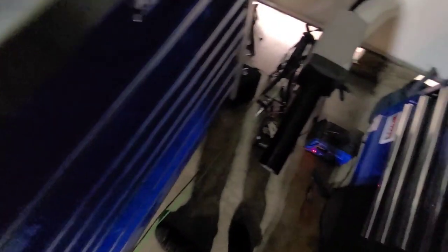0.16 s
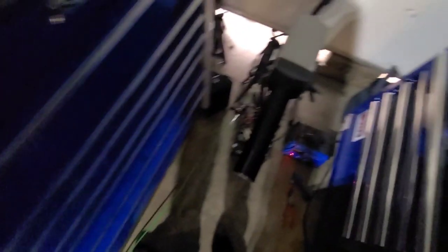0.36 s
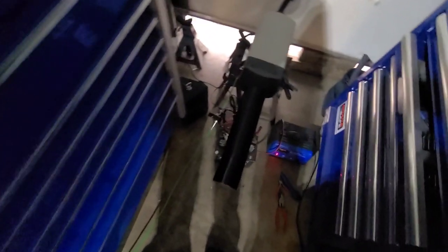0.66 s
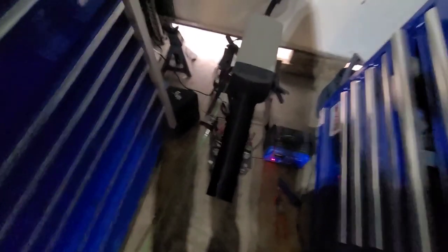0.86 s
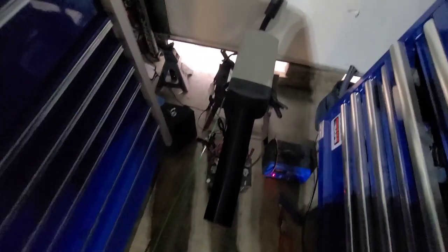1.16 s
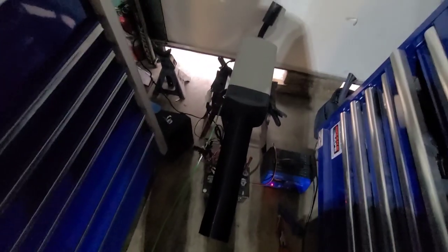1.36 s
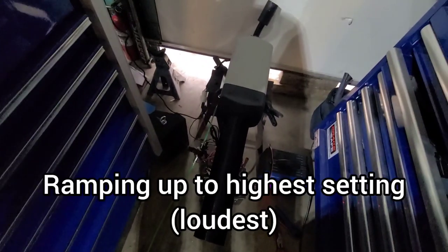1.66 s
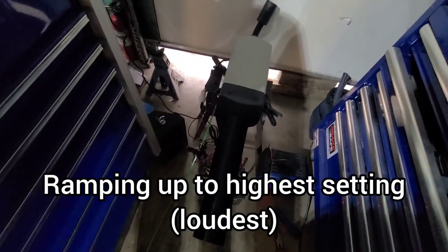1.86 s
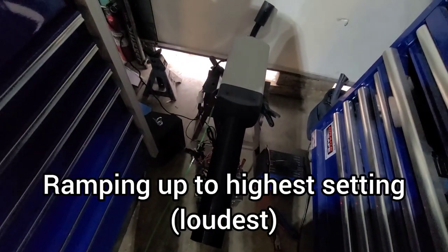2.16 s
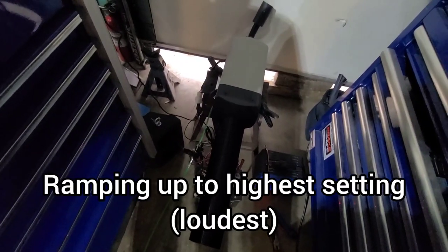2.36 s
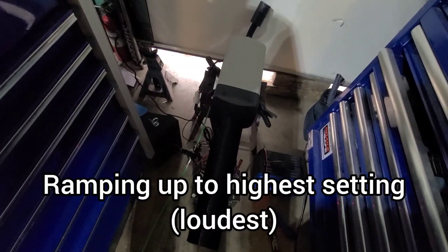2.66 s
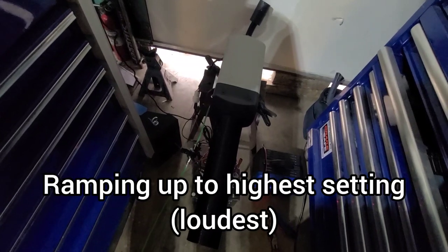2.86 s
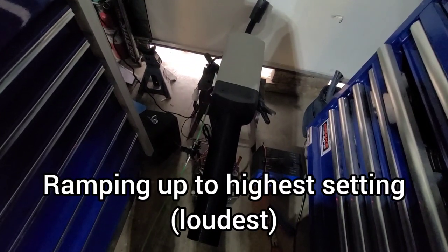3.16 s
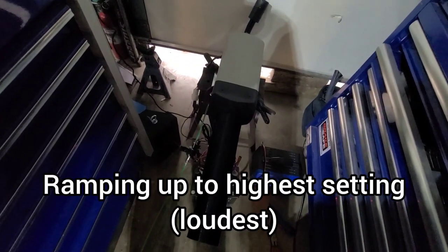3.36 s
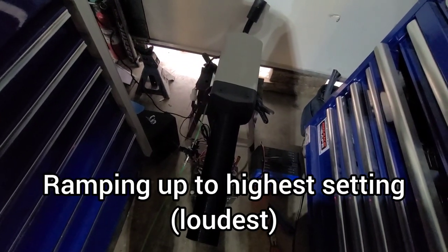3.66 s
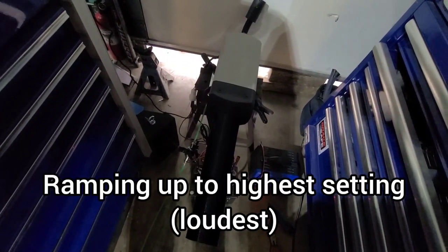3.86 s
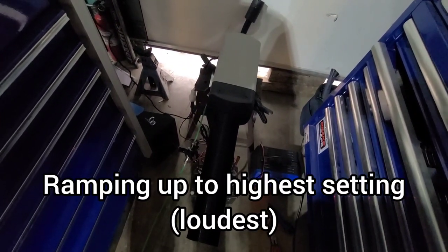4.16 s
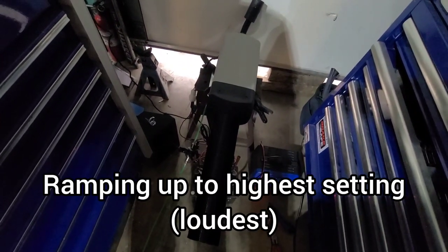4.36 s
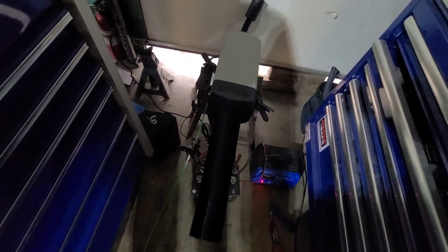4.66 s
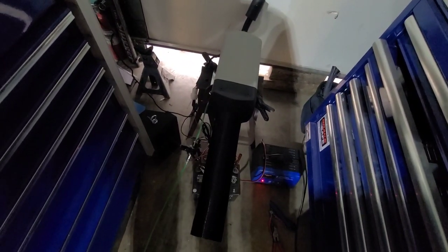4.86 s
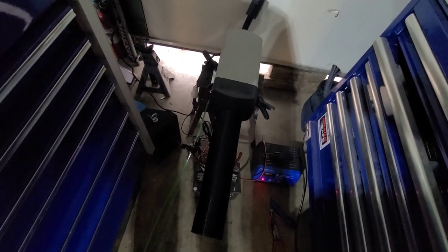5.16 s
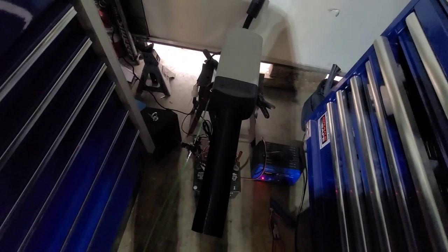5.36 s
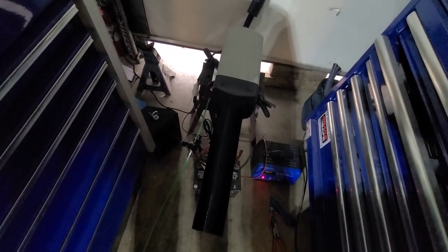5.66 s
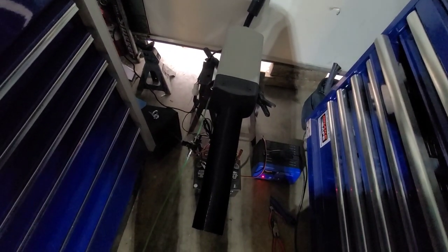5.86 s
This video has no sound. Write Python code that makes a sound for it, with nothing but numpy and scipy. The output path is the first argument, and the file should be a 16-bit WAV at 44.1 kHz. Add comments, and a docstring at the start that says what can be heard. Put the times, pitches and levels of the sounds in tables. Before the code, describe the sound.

Close stereo pickup of a running heater: sharp handling clicks at the very start, mostly to the left, with weaker ones and a soft rustle half a second in. Then steady low blower roar with uneven rumbling surges, a gradually rising hum-like whine, a faint fluttering higher whistle that builds, and regular light double ticks from the fuel pump with a short garage tail.

```python
"""A garage in which a diesel air heater ramps up, heard by a pair of microphones.
The flame and blower roar as turbulent noise, duct resonances and surging low rumble; the fan is a climbing tone
and the air jet a fluttering narrow band. The fuel pump ticks in pairs of noise bursts that ring its body.
Sharp clicks sound close to the microphones at the start: pushes that ring and thump.
Brief rustles and thin hiss are filtered noise."""
import sys
import numpy as np
from scipy import signal
from scipy.fft import rfft, irfft
from scipy.io import wavfile
from scipy.ndimage import uniform_filter1d

SR = 44100
rng = np.random.default_rng(int(sys.argv[2]) if len(sys.argv) > 2 else 0)


def convert_level_to_amplitude(level_db):
    """Map a level in decibels to its linear amplitude factor."""
    exponent = np.asarray(level_db, float) / 20
    return 10 ** exponent


def store_wav(level_fs):
    """Save 16-bit WAV to argv[1]."""
    pcm = np.round(np.clip(np.atleast_2d(level_fs), -1, 1) * 32767)
    wavfile.write(sys.argv[1], SR, pcm.T.astype(np.int16))


N = 264600  # samples
SIZE, HOP = 2048, 512  # short-time spectrum length and step, samples


def evened(x):
    """Normalisation by mean power: scales to rms 1."""
    return x / np.sqrt(np.mean(np.abs(x) ** 2) + 1e-20)


def curve(rows, x):
    """Linear interpolation: reads every column of a table against its first column at x."""
    first, *columns = np.transpose(rows)
    return [np.interp(x, first, column) for column in columns]


def sides(pan_db):
    """Interaural level difference: left and right gains, each taking half of left minus right."""
    return convert_level_to_amplitude(np.array([pan_db / 2, -pan_db / 2]))


def pair(z, pan_db, lead):
    """Interaural phase: one complex signal at both microphones, the left one ahead by lead radians."""
    return sides(pan_db).reshape(2, -1) * np.real([z * np.exp(1j * lead), z])


def add(mix, s, sound):
    """Superposition: mixes a sound in from s seconds on."""
    part = mix[:, round(s * SR):][:, :sound.shape[1]]
    part += sound[:, :part.shape[1]]


def resonate(x, hz, width):
    """Damped oscillator as one complex pole; for a real input its real part has gain 1 at resonance."""
    r = np.exp(-np.pi * width / SR)
    return 2 * signal.lfilter([1 - r], [1, -r * np.exp(2j * np.pi * hz / SR)], x)


def steadied(hz, width, share):
    """Narrow-band noise whose random envelope is partly flattened, by a share from 0 to 1."""
    ring = resonate(resonate(rng.standard_normal(N), hz, width), hz, 3 * width)
    return np.sqrt(2) * evened(ring / np.abs(ring) ** np.clip(share, 0, 1))


def sway(seconds, channels=1):
    """Low-passed noise: a slow random wobble of rms 1."""
    size = max(round(seconds * SR), 1)
    noise = rng.standard_normal((channels, N))
    return evened(uniform_filter1d(uniform_filter1d(noise, size), size))


def airflow():
    """Turbulence: random short-time spectra with drifting patches, partly coherent at both microphones."""
    # Airflow between the duct resonances. Each row: frequency in Hz, spectral density in relative dB per Hz.
    air = [(30, -43), (75, -2.5), (138, -15.5), (227, -4), (345, -12.5), (449, -7), (505, -14), (616, -20),
           (1250, -20), (1590, -29), (2230, -26), (2830, -34), (5000, -47.5), (7500, -51.5), (9000, -62),
           (16000, -69)]
    # Coherence of the microphone pair. Each row: frequency in Hz, left-right likeness from 0 to 1,
    # phase by which left leads in radians, left minus right in dB.
    likeness = [(60, .975, 0, -.6), (356, .99, .2, -.4), (850, 0.88, 0.81, 0.5), (1060, 0.77, 1.38, 1),
                (1730, 0.13, 0.5, -1), (2600, 0.42, 2, 1), (4070, 0.75, 1, 5.5), (5500, .3, 1.5, 2),
                (9000, 0.09, 24, 3.5), (15000, .2, 11.5, 3)]
    level_db, patch_db = -40.5, 1.22  # rms of the airflow before burner power; depth of the patches
    hz = np.fft.rfftfreq(SIZE, 1 / SR)

    def on_log(rows):
        """Interpolation over logarithmic frequency."""
        return curve([(np.log(f), *values) for f, *values in rows], np.log(hz + 1))

    a, b, c, d, patches = rng.standard_normal((N // HOP + 5, len(hz), 5)).T
    patches = evened(uniform_filter1d(uniform_filter1d(patches, 20, 0), 6, 1))
    same, lead, pan_db = on_log(likeness)
    same = np.clip(same, 0, 1)[:, None]
    right = a + 1j * b
    left = same * np.exp(1j * lead)[:, None] * right + np.sqrt(1 - same ** 2) * (c + 1j * d)
    colour = convert_level_to_amplitude(on_log(air)[0][:, None] + patch_db * patches)
    spectra = np.array([left, right]) * sides(pan_db)[:, :, None] * colour
    flow = signal.istft(spectra, nperseg=SIZE, noverlap=SIZE - HOP)[1][:, :N]
    return convert_level_to_amplitude(level_db) * evened(flow)


def ducts(power_db):
    """Resonance: flame noise rings in each duct mode; the lowest modes swell most with burner power."""
    # Duct and housing modes. Each row: frequency in Hz, width in Hz, rms level in dB before burner power
    # (mean of the sides), left minus right in dB, phase by which left leads in radians.
    modes = [(165, 50, -57.5, 0, .1), (238.7, 52, -47.5, -0.3, .15), (295.7, 17, -55.5, .5, .4),
             (392, 30, -57, 1, .25), (440, 50, -51, 1, 0.27), (480, 22, -57, 0, .3),
             (547, 30, -63.5, -7, 0.03), (759.7, 23, -64, -1, 0.07), (1210, 55, -59, -8.5, .5),
             (1274.8, 28, -54, 0.5, 1.5), (1900, 110, -61, -5.5, 4), (2466, 120, -68.5, -6, 2),
             (6420, 1300, -70, 0.5, 1.5)]
    out = np.zeros((2, N))
    for hz, width, db, pan_db, lead in modes:
        flame = rng.standard_normal(N)
        ring = np.sqrt(2) * evened(resonate(resonate(flame, hz, width), hz, width))
        out += convert_level_to_amplitude(db + power_db / (1 + hz / 400)) * pair(ring, pan_db, lead)
    return out


def rumble(t):
    """Driven resonance: the flame pulses near the lowest exhaust mode, which smooths each surge."""
    # Strongest surges of the flame. Each row: centre in seconds, rise above the steady level in dB.
    surges = [(0, 12), (.41, 9.5), (.63, 3), (.8, 8), (.93, 4), (1.2, 6), (1.46, 5), (1.79, 3.5), (2.09, 9),
              (3.13, 5), (3.3, 6), (3.7, 8.5), (3.79, 4.5), (3.96, 3), (4.09, 5), (4.3, 8.5), (4.7, 6),
              (4.81, 7), (5.01, 4.5), (5.3, 10), (5.68, 8), (5.86, 7)]
    steady_db, hz, width = -41.5, 74.5, 15.4  # level before smoothing in dB rms, Hz, Hz
    surge_s, throb_db, throb_s = .036, 2.2, .04  # half length of a surge; depth and smoothing of random throb
    surge_db = sum(db * np.exp(-((t - s) / surge_s) ** 2) for s, db in surges)
    level = convert_level_to_amplitude(steady_db + surge_db + throb_db * sway(throb_s)[0])
    flame = level * steadied(hz, width, .55)
    smooth = resonate(flame, hz, 130) / 2  # halved because the flame signal is complex
    return pair(smooth, -0.78, -0.21)


def whine(t):
    """Blade-passing tone: a climbing sine that the garage favours now at one side, now the other."""
    # Blade tone as the listener turns and settles. Each row: time in seconds, right level in dB rms.
    tone_level = [(0, -59), (.27, -63), (.38, -57), (.8, -53.5), (1.1, -50.5), (1.6, -54.5), (2.5, -51.5),
                  (3.6, -52), (4.2, -52.5), (4.5, -48.5), (5.5, -48), (6, -51)]
    # Balance of the tone. Each row: time in seconds, left minus right in dB.
    balance = [(0, 2.5), (1, -1), (2, -7.5), (3, -9), (4.2, -6), (6, -13.5)]
    start_hz, climb_hz_per_s, waver_hz = 890.6, 9.05, 1.09  # waver: rms of the random pitch drift
    lead, sway_db = -.2, 1.3  # radians by which left leads; random level sway of each side
    right_db, pan_db = curve(tone_level, t)[0], curve(balance, t)[0]
    waver = waver_hz * evened(uniform_filter1d(rng.standard_normal(N), 3000))
    phase = 2 * np.pi * np.cumsum(start_hz + climb_hz_per_s * t + waver) / SR
    level = convert_level_to_amplitude(np.array([right_db + pan_db, right_db]) + sway_db * sway(0.21, channels=2))
    return np.sqrt(2) * level * np.sin([phase + lead, phase])


def whistle(t):
    """Jet whistle: a narrow noise band that strengthens as the flow builds and drops out briefly."""
    # Fuzzy whistle of the air jet. Each row: time in seconds, level between drop-outs in dB rms.
    jet_level = [(0, -63), (.88, -67), (1.02, -61), (1.5, -56.5), (3, -56), (4.5, -56.5), (5.2, -60.5),
                 (6, -54)]
    flutter_db, flutter_s = 3.5, .025  # depth and smoothing of the drop-outs
    flutter = np.minimum(sway(flutter_s), 0)  # only the downward half of the wobble
    level = convert_level_to_amplitude(curve(jet_level, t)[0] + flutter_db * flutter)
    return level * pair(steadied(2226, 27, 0.1), -6, 1.35)


def struck(body, noise):
    """Impact excitation: the chatter of a blow, its bounce and the garage tail in broad resonances."""
    bounce_s, bounce_db = 0.014, -27  # the piston bounces once
    echo_db, echo_t60 = -17, 0.32  # the garage draws each tick out: dB, s
    t = np.arange(noise.shape[-1]) / SR
    sound = 0
    for k, (hz, width, db, t60) in enumerate(body):
        def blow(u):
            """Exponential decay after a 2.5 ms rise."""
            return np.clip(u / 0.0025, 0, 1) * convert_level_to_amplitude(-60 * u / t60)

        shape = blow(t) + convert_level_to_amplitude(bounce_db) * blow(t - bounce_s)
        shape += np.minimum(t / 0.0034, 1) * convert_level_to_amplitude(echo_db - 60 * t / echo_t60)
        own = np.roll(noise, k * HOP, axis=1)  # each part chatters in its own way
        ring = resonate(resonate(own, hz, width), hz, width).real
        sound = sound + convert_level_to_amplitude(db) * shape * evened(ring)
    return sound


def pump():
    """Modal excitation: each stroke, a blow and a softer return, rings body, mount and snap."""
    # Fuel pump strokes, a little quicker from the sixth on. Each row: blow time in seconds, blow level in dB,
    # return level in dB, mount level relative to the blow in dB, strongest ring of the blow in Hz.
    strokes = [(.1443, -44.5, -52, 0, 6060), (0.5008, -46.5, -52.5, -3, 6740), (0.857, -46, -50, 0, 5970),
               (1.214, -44.5, -55.5, -6.5, 6380), (1.569, -46, -56.5, -2, 6550),
               (1.9255, -45, -52.5, -4, 6760), (2.2692, -45, -52, 0, 6030), (2.611, -46.5, -54.5, -7, 5630),
               (2.9555, -46, -54, 5.5, 6900), (3.299, -46, -52.5, 0, 7040), (3.641, -44, -54.5, -9, 7080),
               (3.9846, -44, -56, -3.5, 6720), (4.3276, -45.5, -51, -1, 6830),
               (4.6713, -45, -55, -11, 7100), (5.015, -46.5, -50, -.6, 6100),
               (5.357, -47.5, -56, 1.5, 7460), (5.701, -47.5, -58, 5.5, 6100)]
    # Pump body. Each row: frequency in Hz, width in Hz, relative level in dB, 60 dB decay time in seconds.
    body = [(5695, 480, -2, 0.037), (6250, 350, 0.5, 0.03), (6900, 1140, 3.5, 0.027),
            (4970, 1000, -5.5, 0.022), (8000, 390, -13.5, 0.0082)]
    # Pump mount. Each row: frequency in Hz, width in Hz, relative level in dB, 60 dB decay time in seconds.
    mount = [(3290, 510, -1, 0.028)]
    # Bright snap. Each row: frequency in Hz, width in Hz, relative level in dB, 60 dB decay time in seconds.
    bright = [(4000, 9300, 14, 0.022), (9700, 3700, 3.1, 0.033), (12500, 8000, 2.5, 0.025),
              (15300, 2300, 1, 0.03)]
    return_s, return_mount_db = .0535, -13  # the piston springs back this much later; its relative mount level
    blow_pan_db, return_pan_db, pan_spread_db = 3, 1.5, -1.5  # left minus right, and its random spread
    return_hz, return_spread_hz = 6100, 260  # the ring that a return favours
    snap_rel_db, snap_share = -11.5, 0.59  # relative to a -51.5 dB hit; share by which it follows strength
    out = np.zeros((2, N))
    chances = rng.uniform(-1.2, 1, (len(strokes), 3))
    noises = rng.standard_normal((len(strokes), 2, 2, SR // 5))
    for stroke, (u, v, w), both in zip(strokes, chances, noises):
        s, blow_db, back_db, mount_db, ring_hz = stroke
        blow_pan = blow_pan_db + pan_spread_db * u
        back_pan = return_pan_db + pan_spread_db * v
        back_hz = return_hz + return_spread_hz * w
        hits = ((s, blow_db, mount_db, blow_pan, ring_hz),
                (s + return_s, back_db, return_mount_db, back_pan, back_hz))
        for (at, db, knock_db, pan_db, core_hz), noise in zip(hits, both):
            tick = struck(body + [(core_hz, 300, 0, .05)], noise)
            tick += convert_level_to_amplitude(knock_db) * struck(mount, noise)
            snap_db = snap_rel_db + (snap_share - 1) * (db + 51.5)
            tick += convert_level_to_amplitude(snap_db) * struck(bright, noise)
            add(out, at - .001, convert_level_to_amplitude(db) * sides(pan_db)[:, None] * tick)
    return out


def clicks():
    """Impulse response: a sharp push in faint crackle, band-limited, with a short ring and a thump."""
    # Sharp clicks. Each row: start in seconds, peak level in dB (mean of the sides), left minus right in dB,
    # top edge of the band in Hz, ring in Hz.
    events = [(0.0354, -32, -14, 6600, 2440), (0.0393, -32, -15, 6840, 2700), (0.0443, -28, -8, 7000, 6000),
              (0.0485, -8, -14, 7150, 4840), (0.0524, -21, 5, 8000, 6200), (0.06, -15, -12, 6640, 2690),
              (0.0624, -13.5, 18, 8000, 6900), (.0626, -21, -1.5, 4000, 2500),
              (0.0634, -19, -7, 2240, 1030), (.213, -39, 1, 5000, 2500), (.249, -44, -14, 7000, 4500),
              (.432, -28, -4.5, 6600, 2480), (.4905, -37, 8, 7000, 6000), (0.4933, -28, -1.5, 1200, 700),
              (.517, -46, -2, 5000, 3500), (0.5259, -22, -9, 6800, 1960)]
    crackle_t60 = 0.0045  # s
    ring_gain, ring_width = 1.6, 800  # gain, Hz
    shell_hz, shell_width, shell_db = 1070, 830, 4  # the shell that every click thumps
    far_side_s, far_side_db = .0004, 10  # greatest delay of the quieter side, at this level difference or more
    out, t = np.zeros((2, N)), np.arange(600) / SR
    low_cut = signal.butter(4, 520, "highpass", fs=SR, output="sos")
    noises = rng.standard_normal((len(events), 2, len(t)))
    for (s, db, pan_db, edge_hz, ring_hz), noise in zip(events, noises):
        crackle = noise * np.minimum(t / 0.0001, 1) * convert_level_to_amplitude(-60 * t / crackle_t60)
        push = .3 * crackle - signal.unit_impulse(len(t), idx=14)
        ring = ring_gain * resonate(push, ring_hz, ring_width).real
        thump = convert_level_to_amplitude(shell_db) * resonate(push, shell_hz, shell_width).real
        crack = push + ring + thump
        dull = signal.sosfilt(signal.butter(4, edge_hz, fs=SR, output="sos"), crack)
        leak = convert_level_to_amplitude(-16.5) * (edge_hz / 7000) ** 2 * crack  # a little passes the edge
        crack = signal.sosfilt(low_cut, dull + leak)
        crack = crack / np.abs(crack).max(axis=1, keepdims=True)
        crack = convert_level_to_amplitude(db) * sides(pan_db)[:, None] * crack
        right_late_s = far_side_s * np.clip(pan_db / far_side_db, -1, 1)
        add(out[:1], s + max(-right_late_s, 0), crack[:1])
        add(out[1:], s + max(right_late_s, 0), crack[1:])
    return out


def rustles(t):
    """Friction noise: brief scrapes, each a swell of rough, grainy band noise."""
    # Soft rustles. Each row: centre in seconds, length in seconds, level at the centre in dB rms,
    # low band edge in Hz, high band edge in Hz.
    scrapes = [(0.511, 0.039, -50, 1500, 5500), (1.79, .03, -66, 4000, 15000),
               (1.837, 0.048, -61, 4000, 15000), (2.436, 0.11, -63.5, 4830, 8700)]
    out = np.zeros((2, N))
    grain_db = 3.2 * evened(uniform_filter1d(rng.standard_normal(N), 60))
    grain = rng.standard_normal((2, N)) * convert_level_to_amplitude(grain_db)
    for s, length, db, low_hz, high_hz in scrapes:
        band = signal.butter(2, [low_hz, high_hz], "bandpass", fs=SR, output="sos")
        swell = np.exp(-((t - s) / length * 2) ** 2)
        out += convert_level_to_amplitude(db) * swell * evened(signal.sosfilt(band, grain))
    return out


def hiss(t):
    """Incoherent noise: thin high hiss, unrelated at the two microphones, and a drifting top band."""
    # Colour of the wide hiss. Each row: frequency in Hz, spectral density in relative dB per Hz.
    colour = [(6000, -16), (7800, 4), (9000, -5), (10000, 0), (11300, -2), (12500, 4), (14500, 4.5),
              (16000, 2)]
    wide_db, fade_db_per_s = -70.5, -0.5  # rms at the start (mean of the sides), thinning slowly
    top_db, top_sway_db = -77.5, 0.5  # rms of the top band and of its level drift
    noise = rng.standard_normal((2, N))
    hz = np.fft.rfftfreq(N, 1 / SR)
    wide = irfft(rfft(noise) * convert_level_to_amplitude(curve(colour, hz)[0]) * (hz > colour[0][0]), N)
    wide = convert_level_to_amplitude(wide_db + fade_db_per_s * t) * evened(wide)
    top = resonate(resonate(noise[:, ::-1], 15600, 250), 15600, 250).real  # reversed: unlike the wide hiss
    top = convert_level_to_amplitude(top_db + top_sway_db * sway(.3)) * evened(top)
    return sides(3.9)[:, None] * (wide + top)


def scene():
    """Superposition of all sources at the microphones; burner power drives the ducts and the airflow."""
    # Burner power. Each row: time in seconds, level in dB; a quarter of the dB reaches the airflow.
    burner = [(0, 1.5), (1, -1), (2, 1), (3, 0.5), (4, 2.5), (5, 1.5), (6, 4.5)]
    t = np.arange(N) / SR
    power_db = curve(burner, t)[0]
    roar = convert_level_to_amplitude(0.25 * power_db) * airflow() + ducts(power_db) + rumble(t)
    steady = roar + whine(t) + whistle(t) + hiss(t)
    return steady + pump() + clicks() + rustles(t)


def top_cut(x):
    """Nothing passes above the cut-off."""
    return signal.sosfilt(signal.butter(12, 16760, fs=SR, output="sos"), x)


def record(dry):
    """Band limitation: high-pass and low-pass filters set the microphone band."""
    # Microphone band: low edge in Hz, high edge in Hz.
    band_edges = [40, 15800]
    low_cut = signal.butter(2, band_edges[0], "highpass", fs=SR, output="sos")
    mix = signal.sosfilt(low_cut, dry)
    high_cut = signal.firwin(511, band_edges[1], fs=SR)
    mix = signal.oaconvolve(mix, high_cut[None], "same")
    return top_cut(mix)


dry = scene()
out = record(dry)
store_wav(out)
```